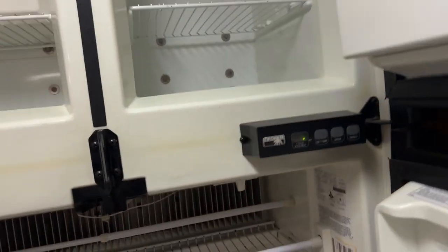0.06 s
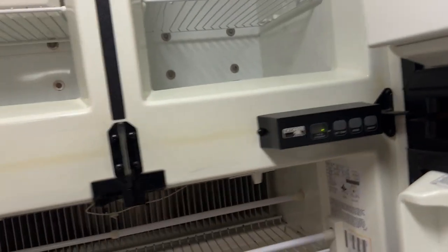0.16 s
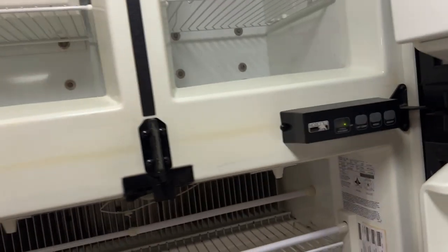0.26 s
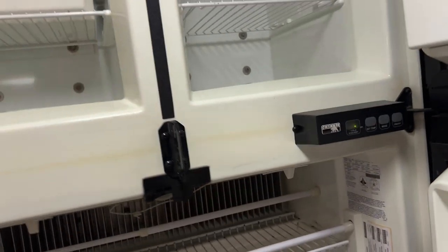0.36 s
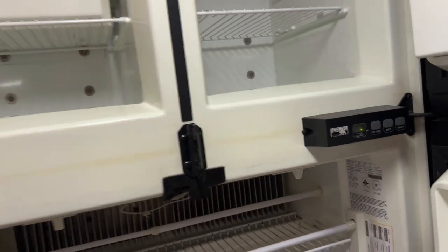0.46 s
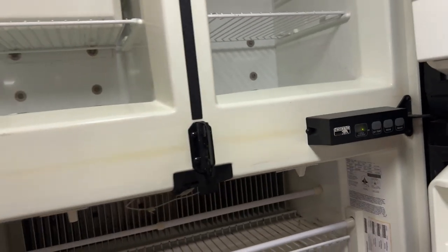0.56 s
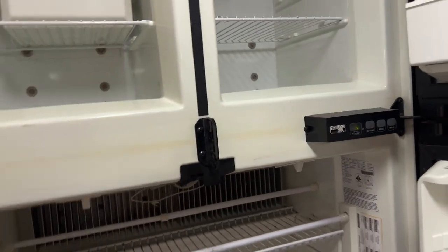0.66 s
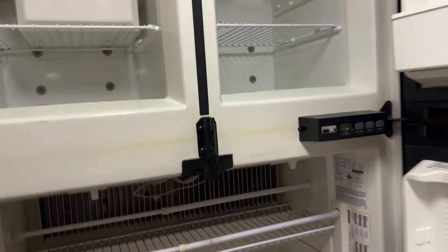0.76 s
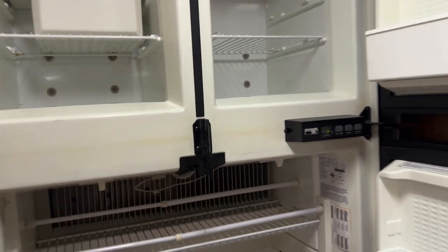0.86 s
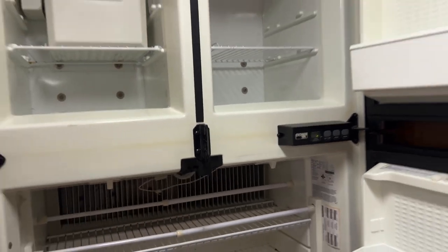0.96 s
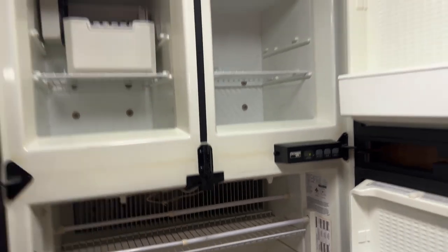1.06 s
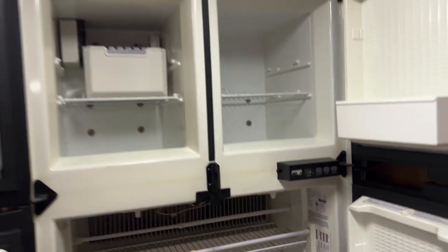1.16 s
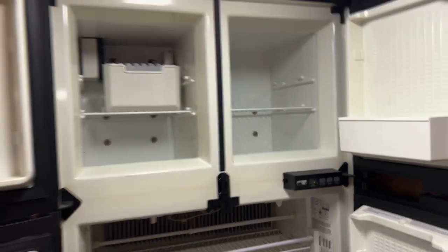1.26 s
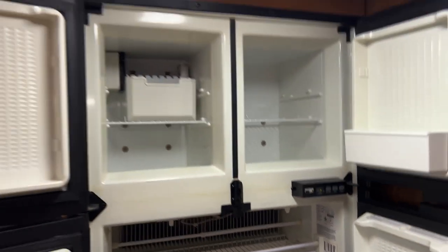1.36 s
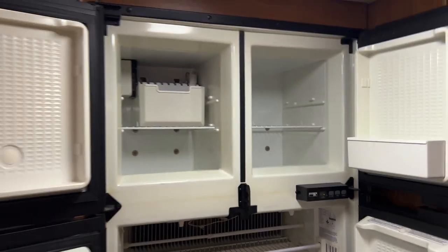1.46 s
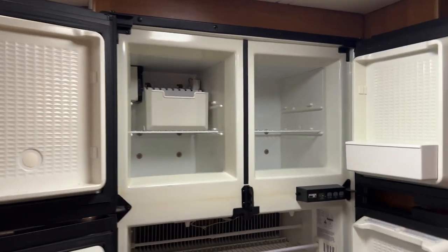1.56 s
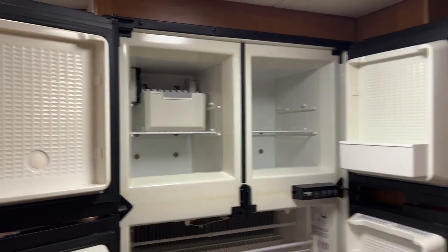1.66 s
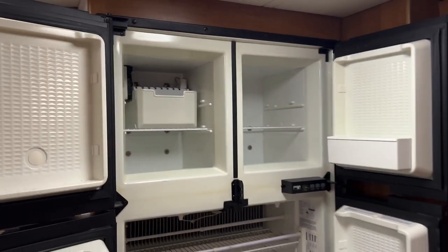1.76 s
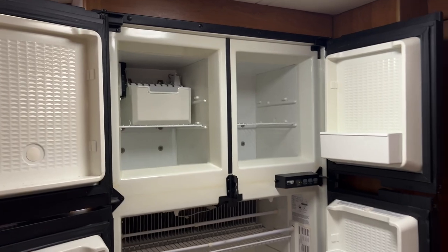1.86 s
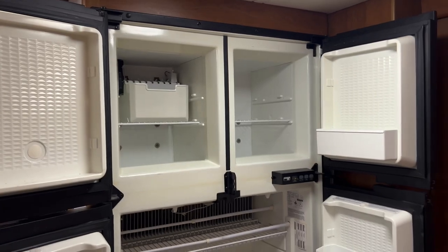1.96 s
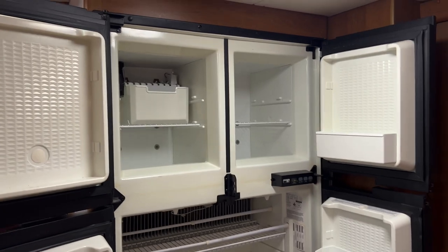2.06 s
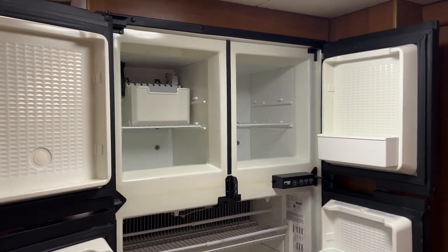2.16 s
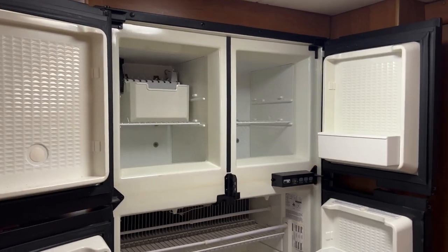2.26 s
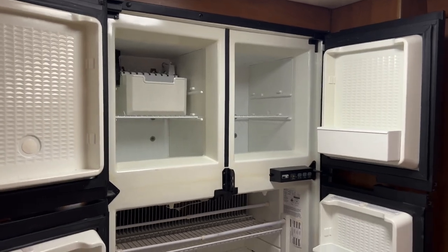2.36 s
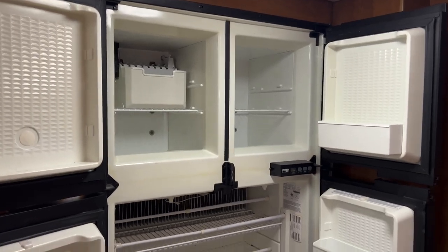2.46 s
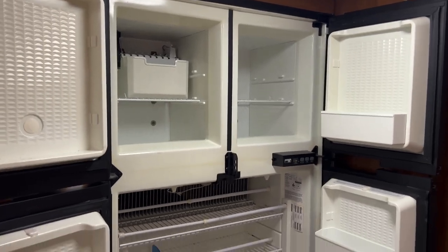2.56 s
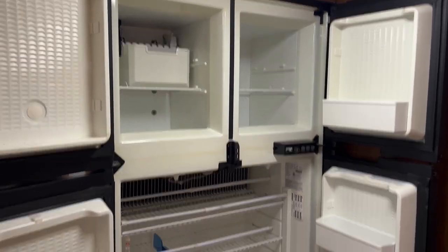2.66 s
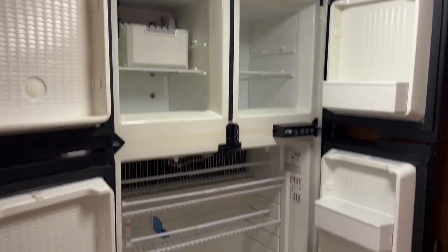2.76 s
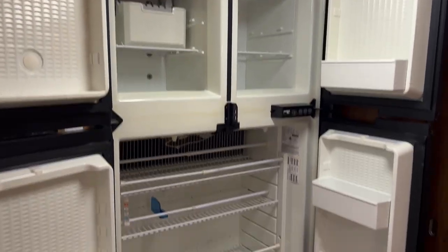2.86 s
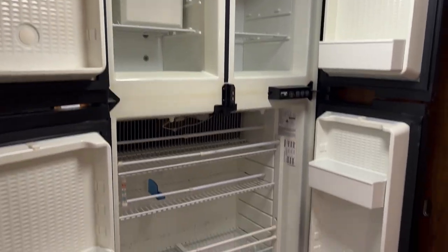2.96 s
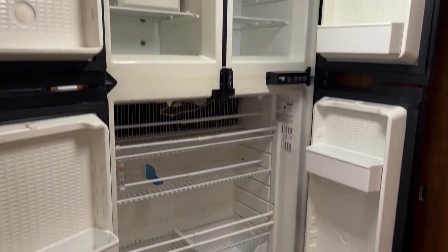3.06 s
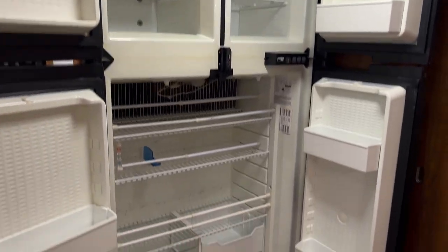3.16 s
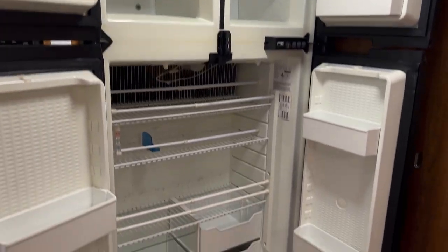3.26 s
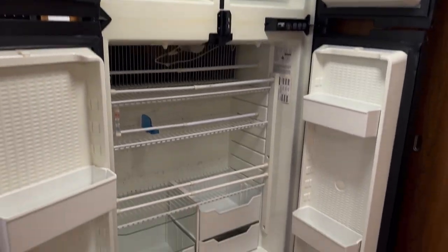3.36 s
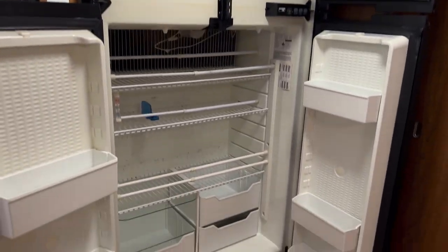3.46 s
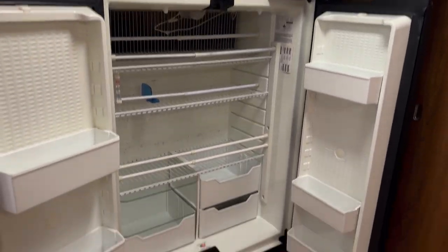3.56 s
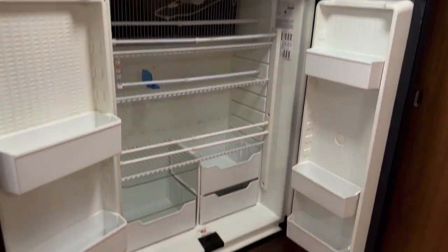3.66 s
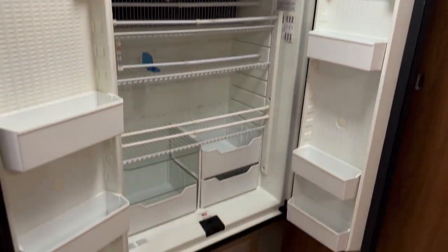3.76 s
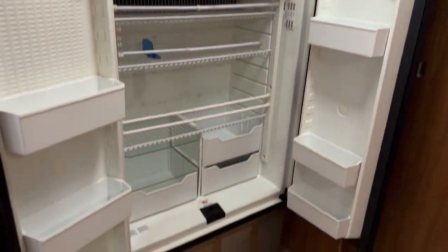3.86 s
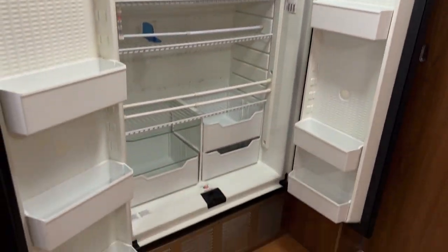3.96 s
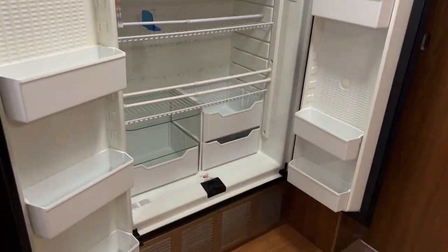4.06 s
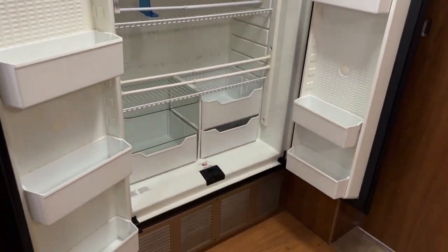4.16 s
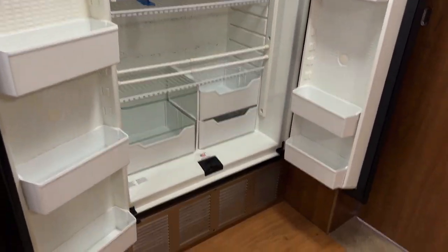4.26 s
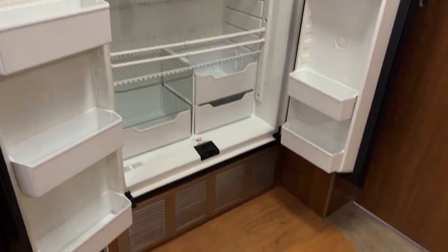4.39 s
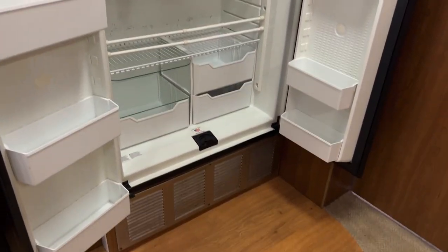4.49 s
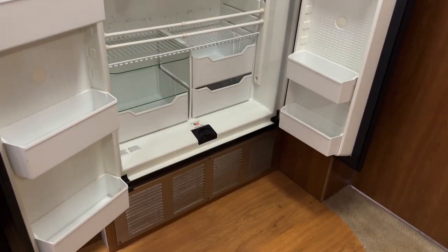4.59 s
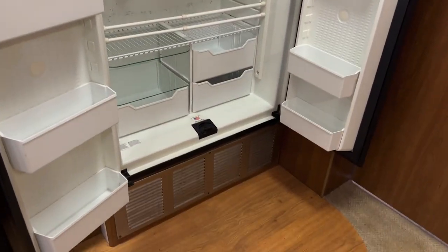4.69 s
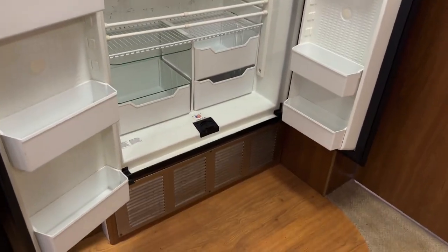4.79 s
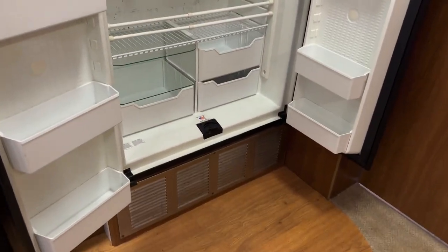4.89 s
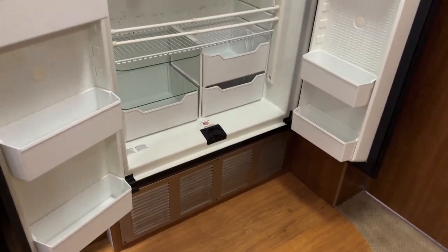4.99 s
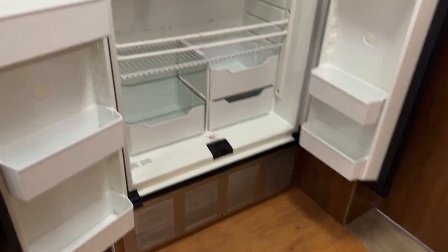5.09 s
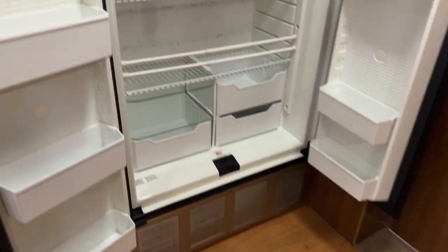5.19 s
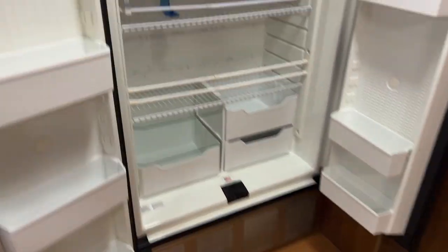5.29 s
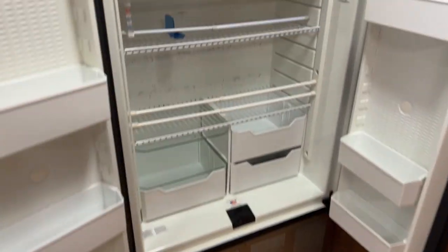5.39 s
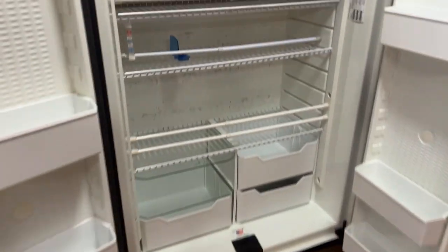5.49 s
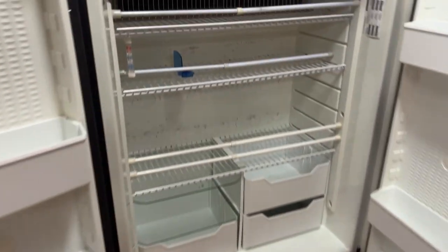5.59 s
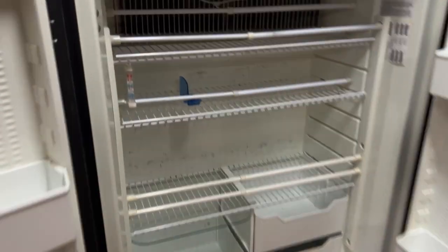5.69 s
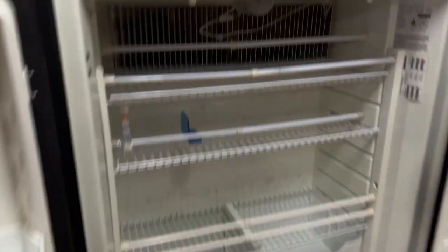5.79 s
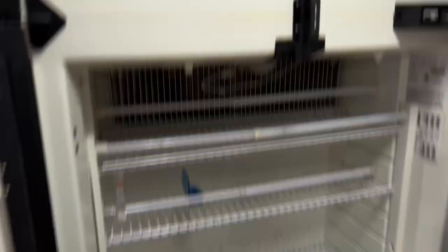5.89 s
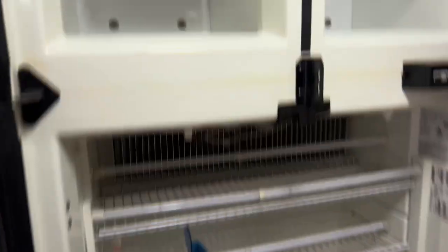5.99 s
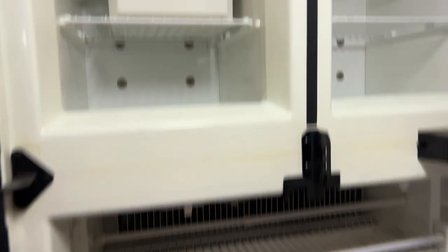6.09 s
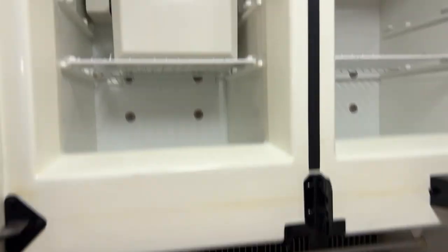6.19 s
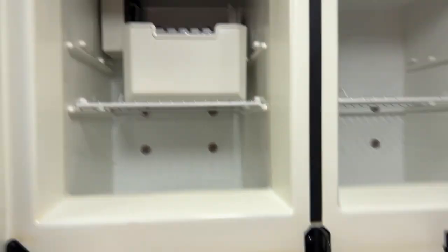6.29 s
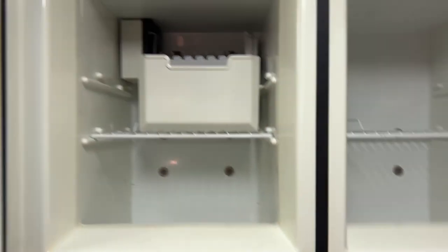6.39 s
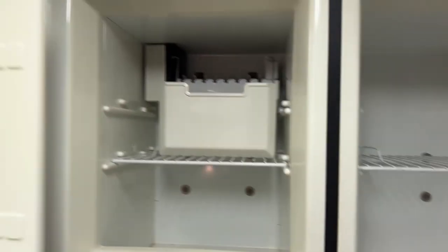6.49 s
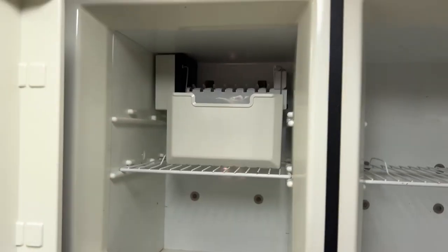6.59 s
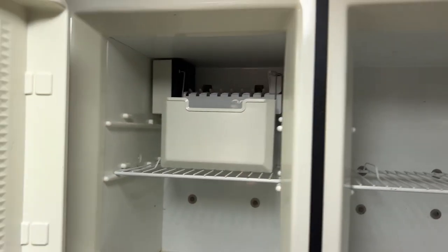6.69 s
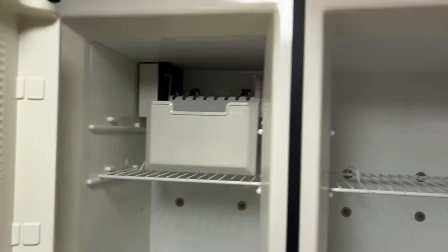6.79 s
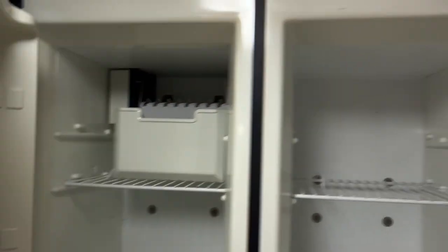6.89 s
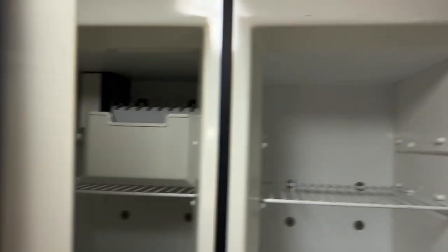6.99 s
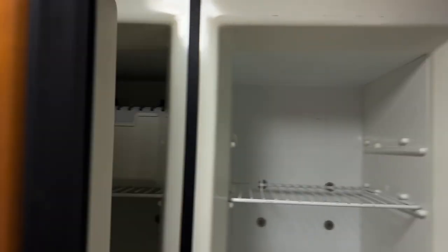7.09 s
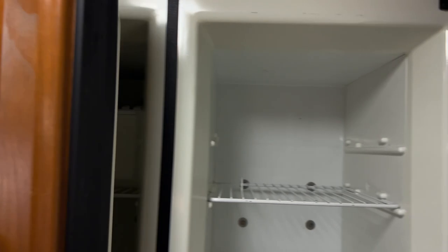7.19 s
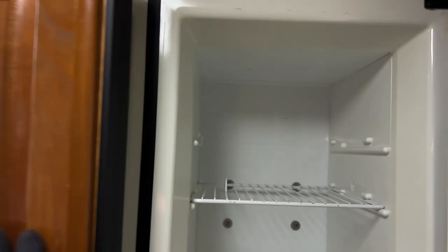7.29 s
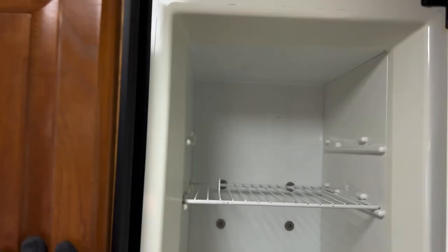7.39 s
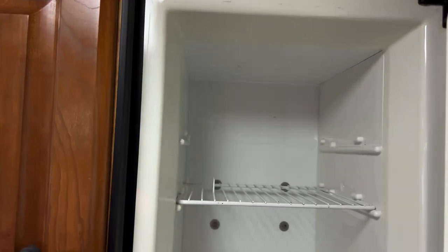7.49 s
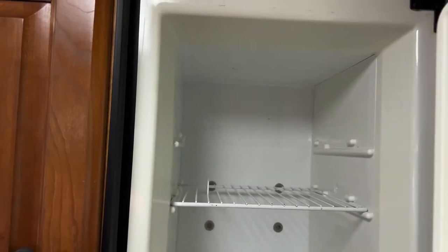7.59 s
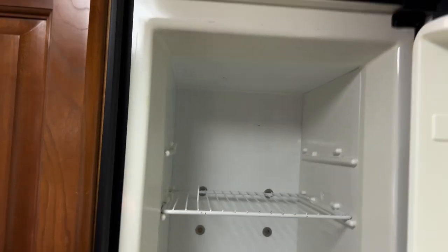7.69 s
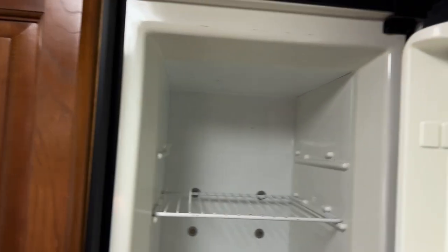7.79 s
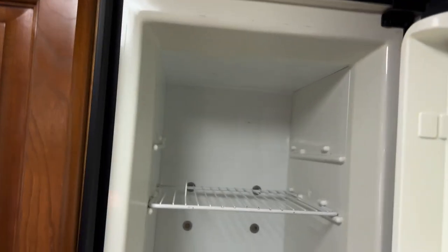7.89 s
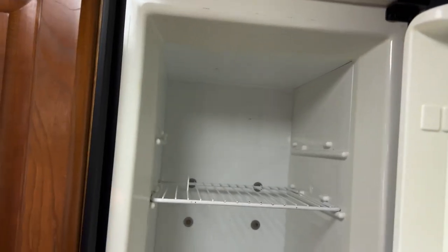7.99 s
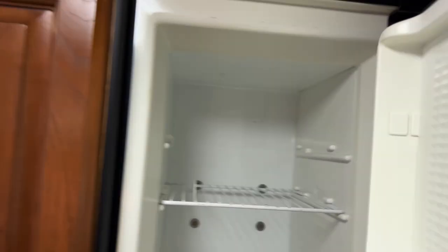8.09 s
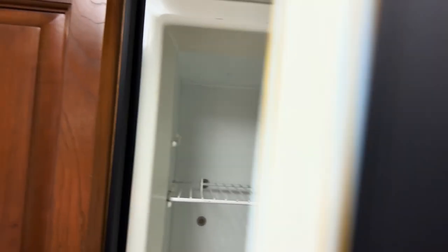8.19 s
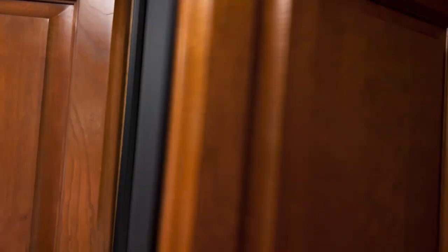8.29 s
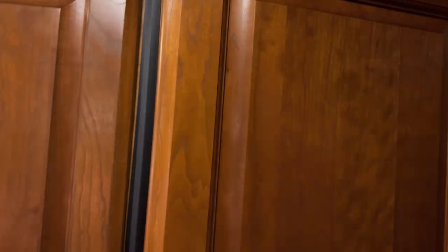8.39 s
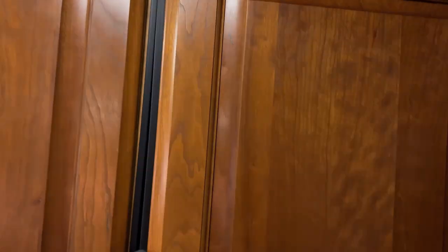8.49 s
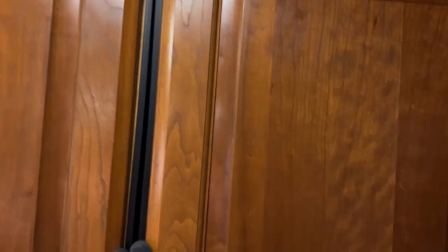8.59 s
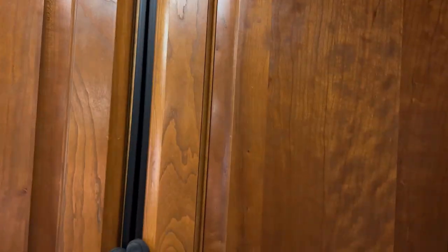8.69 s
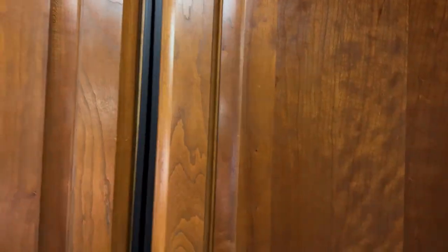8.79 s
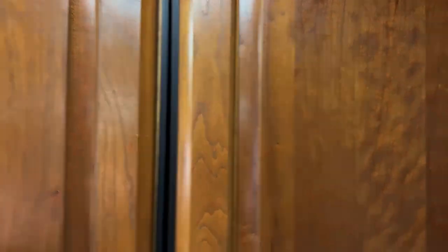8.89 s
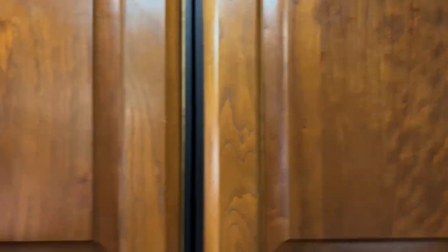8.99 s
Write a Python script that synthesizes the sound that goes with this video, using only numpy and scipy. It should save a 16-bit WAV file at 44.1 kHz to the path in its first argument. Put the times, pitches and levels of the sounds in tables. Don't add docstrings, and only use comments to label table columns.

```python
import sys
import numpy as np
from scipy import signal
from scipy.fft import rfft, irfft, next_fast_len
from scipy.io import wavfile
from scipy.ndimage import uniform_filter1d

SR = 44100
rng = np.random.default_rng(int(sys.argv[2]) if len(sys.argv) > 2 else 0)


def dump(signal):
    limited = np.clip(np.atleast_2d(signal).T, -1, 1)
    pcm = np.round(limited * 32767).astype(np.int16)
    wavfile.write(sys.argv[1], SR, pcm)


def amplitude_ratio(level_db):
    exponent = np.asarray(level_db, float) / 20
    return 10 ** exponent


N = 399105


def evened(x):
    return x / np.sqrt(np.mean(x ** 2) + 1e-20)


def read(points, hz):
    f, value = np.transpose(points)
    return np.interp(np.log(hz + 1), np.log(f + 1), value)


def add(mix, s, sound):
    part = mix[:, max(round(s * SR), 0):][:, :sound.shape[-1]]
    part += sound[..., :part.shape[1]]


def drift(hz):
    steps = rng.standard_normal(400)
    return evened(np.interp(np.arange(N) / SR * hz, np.arange(400), steps))


def resonate(x, hz, width):
    return signal.lfilter(*signal.iirpeak(hz, hz / width, fs=SR), x)


def two_ports(a, b, same, hz):
    like = np.clip(read(same, hz), 0, 1)
    if a.ndim == 2:
        like = like[:, None]
    return np.array([a, like * a + np.sqrt(1 - like ** 2) * b])


def port_phase(hz, draw):
    return 1.7 * min(hz / 1500, 1) * (draw - .5) * np.array([[1], [-1]])


def noise(points, patchy_db, flicker_db, same):
    frames, hz = N // 256 + 5, np.fft.rfftfreq(512, 1 / SR)
    a, b, c, d, patches = rng.standard_normal((frames, 257, 5)).T
    patches = uniform_filter1d(patches, size=8, axis=0)
    patches = evened(uniform_filter1d(patches, size=14, axis=1))
    z = two_ports(a + 1j * b, c + 1j * d, same, hz)
    flicker = flicker_db * rng.standard_normal(frames)
    z *= amplitude_ratio(read(points, hz)[:, None] + patchy_db * patches + flicker)
    return evened(signal.istft(z, nperseg=512, noverlap=256)[1][:, :N])


def zones(rows, nodes):
    edge_db, edge_bend, node_s = -11, 3.9, 0.4
    t = np.arange(0, N + 256, 256) / SR
    swing = sum(amplitude_ratio(db + edge_db * abs((t - s) / reach) ** edge_bend) for db, s, reach in rows)
    for s in nodes:
        swing = swing * np.tanh((t - s) / node_s)
    return np.interp(np.arange(N) / SR, t, swing)


# level/dB, centre t/s, reach/s
HUM = [
    [(-35, 3, 10), (-44.5, .5, 1.6), (-40.5, 7.4, 2.2)],
    [(-37.5, .05, .55), (-38.5, 1.16, 0.63), (-43.5, 2.6, 0.8), (-40, 4.52, 0.97), (-33, 7.6, 1.9)],
    [(-55.5, 0.082, 0.31), (-50.5, 2.58, 1.13), (-53, 4.5, 1.12), (-62.5, 6.6, 0.89), (-53.5, 9, 2.5)],
    [(-50.5, 0.93, 1), (-53, 2.27, 0.99), (-54, 4.23, 1.12), (-52, 5.85, 0.62), (-56.5, 7.5, 1.6)],
]
NODES = [
    [],
    [3.02, 5.8],
    [.88, 6.8],
    [1.5, 5.37],
]
# order, level/dB, loudest t/s, lasting/s
UPPER = [(.5, -58.5, 4, 9), (1.5, -64.5, 4, 9), (2.5, -70, 3.3, 7.7), (5, -74, 6, 2.7), (6, -64, 4.1, 1.8),
         (7, -68, 7.5, 2.1), (8, -67, 4.8, 2), (9, -69.5, 4.9, 0.3), (10, -70.5, 2.6, 0.81),
         (10, -72, 5.5, 1.1), (6.5, -74.5, 2.5, 3.2), (7.5, -74.5, 3.5, 1.8), (8.5, -72.5, 2.6, 4.2),
         (9.5, -78, 3.1, 2.5), (11.5, -81, 3.5, 1.8), (11, -70.5, 4.5, 0.57), (12, -74, 2.7, 2.2),
         (12.5, -75, 7.1, 2.7), (13.5, -77, 2.5, 1.6), (14, -81, 6.1, 1.5)]
# level/dB, centre t/s, reach/s
PANEL = [(-66, 2.34, 0.84), (-69, 3.43, 0.38), (-74, 4.58, 0.68), (-71, 5.51, 0.28), (-75, 6.8, .8)]


def generator():
    turn = 2 * np.pi * np.cumsum(51.12 + .06 * drift(5.)) / SR
    level = amplitude_ratio(-1.0 + 0.5 * drift(25.))
    out = np.zeros(N)
    for k, rows in enumerate(HUM):
        out += zones(rows, NODES[k]) * level * np.cos((k + 1) * turn - 1.007 * k)
    for order, db, s, lasting in UPPER:
        swing = np.cos(order * turn + 2 * np.pi * rng.random())
        out += zones([(db, s, lasting)], []) * amplitude_ratio(1.2 * drift(7.1)) * swing
    return out + zones(PANEL, []) * amplitude_ratio(5 + .8 * drift(12.)) * np.cos(13 * turn)


# f/Hz, level/dB per Hz
AIR = [(100, -35), (170, -5), (214, -6), (254, -8.5), (402, -14.5), (506, -18), (637, -16.5), (882, -26.5),
       (2210, -31.5), (2890, -45), (4500, -55), (7110, -52), (9500, -63), (12200, -64), (16500, -74)]
# f/Hz, level/dB per Hz
RUMBLE = [(15, -35.5), (30, -17), (80, 4), (130, 0.5)]
# f/Hz, likeness/1
SAME = [(60, 0.23), (180, -0.74), (550, -0.25), (1650, -1.6), (4970, 0.8), (15000, 0.38)]


def air():
    size = next_fast_len(N, True)
    hz = np.fft.rfftfreq(size, 1 / SR)
    a, b = rfft(rng.standard_normal((2, size)))
    z = two_ports(a, b, SAME, hz) * amplitude_ratio(read(RUMBLE + AIR[1:], hz))
    throb_db = 0.57 * np.cos(2 * np.pi * 51.12 * np.arange(N) / SR)
    return amplitude_ratio(-51 + 0.64 * drift(9.6) + throb_db) * evened(irfft(z, size)[:, :N])


# f/Hz, level/dB per Hz
CLOTH = [(1650, -29), (2800, -4.5), (8590, -12.5), (10300, -24), (13700, -23.5), (15100, -17.5),
         (16100, -24.5), (16500, -45.5)]
# f/Hz, likeness/1
NEAR = [(200, 0.96), (1000, 0.28), (4000, 0.16), (8000, 0.56), (12000, 1)]
# start t/s, end t/s, hiss level/dB, duller level/dB
STROKES = [(0.095, 0.154, -63, -56.5), (0.133, 0.342, -62, -58), (0.265, 0.56, -63.5, -60),
           (0.524, 0.685, -73, -67), (0.744, 0.815, -60.5, -57), (0.792, 0.891, -72, -61.5),
           (0.926, 1.056, -65.5, -60), (1.045, 1.09, -54, -53.5), (1.135, 1.167, -75, -62),
           (1.149, 1.218, -66, -60.5), (1.518, 1.598, -76, -67.5), (1.683, 1.8, -87, -71),
           (2.035, 2.1, -85, -66.5), (2.216, 2.284, -73.5, -62), (2.405, 2.49, -82, -66.5),
           (2.523, 2.575, -83, -71), (5.022, 5.065, -78, -73), (5.191, 5.308, -75, -68),
           (5.295, 5.352, -85, -69), (5.525, 5.7, -76.5, -67), (5.968, 6.163, -81, -65),
           (6.102, 6.212, -73, -68), (6.11, 6.158, -69, -54), (6.13, 6.563, -73.5, -64.5),
           (6.498, 6.596, -70, -71), (6.575, 6.79, -85, -71.5), (6.786, 7.064, -66, -62.5),
           (7.11, 7.492, -69, -68.5), (7.354, 7.474, -69, -76), (7.612, 7.727, -67, -65.5),
           (7.961, 8.008, -65, -57), (7.996, 8.149, -64, -59.5), (8.16, 8.266, -56.5, -49.5),
           (8.286, 8.414, -66.5, -61.5), (8.379, 8.565, -65.5, -57), (8.76, 8.84, -79, -68)]
# start t/s, end t/s, level/dB
SLIDES = [(0.773, 0.825, -93), (.955, 1.013, -81), (1.049, 1.063, -67), (6.898, 7.023, -80),
          (7.302, 7.456, -75), (7.478, 7.554, -56.5), (8.6, 8.681, -55), (7.973, 8.007, -82),
          (8.023, 8.103, -71.5), (8.188, 8.257, -58.5), (8.305, 8.38, -74.5), (8.466, 8.522, -71.5),
          (8.78, 8.826, -82.5)]
# t/s, level/dB
MOVING = [(0, -76.5), (1.2, -78), (2.6, -86), (2.9, -110), (4.8, -110), (5.3, -80.5), (6, -78.5),
          (7.1, -84.5), (8, -83.5), (8.7, -68.5), (9, -79.5)]


def rustle():
    strokes = np.zeros((3, N))
    for start, end, db, dull_db in STROKES:
        levels = amplitude_ratio(np.array([db, dull_db, db - 32.5 + 0.74 * (db + 61.5)]))
        add(strokes, start, levels[:, None] * signal.windows.tukey(round((end - start) * SR), .65))
    for start, end, db in SLIDES:
        shape = signal.windows.tukey(round((end - start) * SR), .5)
        add(strokes[2:], start, amplitude_ratio(db + 8.5) * shape[None])
    keep = np.exp(-1 / (0.0029 * SR))
    hiss, under, top = signal.lfilter([1 - keep], [1, -keep], strokes) * amplitude_ratio(1.2 * drift(23.0))
    cloth = noise(CLOTH, patchy_db=3.5, flicker_db=0.5, same=NEAR)
    dull = noise([(250, -30), (500, -2), (1200, -1), (2100, 0), (3000, -9), (4500, -35)],
                 patchy_db=1.2, flicker_db=1.4, same=NEAR)
    bright = evened(signal.sosfilt(signal.butter(6, 10000, "high", fs=SR, output="sos"), cloth))
    fibres = amplitude_ratio(5.0 * rng.exponential(1, N)) * (rng.random(N) < 500 / SR)
    snaps_free = evened(signal.lfilter([1], [1, -np.exp(-1 / (.001 * SR))], fibres))
    grain = evened(1 + 0.12 * snaps_free)
    s, db = np.transpose(MOVING)
    bed = amplitude_ratio(np.interp(np.arange(N) / SR, s, db) + 4.1 * drift(40.0))
    return grain * (hiss + bed) * cloth + under * dull + top * bright


def knocks(rows, modes, ring_db, crack_db, bend, rise, top_db, mid_hz=4000):
    out, t = np.zeros((2, N)), np.arange(4200) / SR
    edges = [(200, 1000), (900, mid_hz), (mid_hz, 9500), (9500, 17000)]
    bands = [signal.butter(3, hz, "band", fs=SR, output="sos") for hz in edges]
    apart = [0.4, 1.0, 0.29, 0.083]
    for s, db, low_db, high_db, t60 in rows:
        shared, left, right = rng.standard_normal((3, len(t)))
        own = np.array([left, right])
        low, mid, high, top = (evened(signal.sosfilt(b, shared + a * own)) for a, b in zip(apart, bands))
        fall = amplitude_ratio(-60 * (t / np.clip(t60, .005, .2)) ** bend)
        crack = amplitude_ratio(crack_db - 60 * t / 0.0016)
        blow = amplitude_ratio(low_db) * low * fall * np.minimum(t / 0.0033, 1)
        rattle = mid + amplitude_ratio(high_db) * high + amplitude_ratio(high_db + top_db) * top
        blow += rattle * (fall + crack) * np.minimum(t / .001, 1)
        for (hz, mode_db, ring), (u, v, w) in zip(modes, rng.random((len(modes), 3))):
            near_hz = hz * (1 + .03 * (u - .5))
            swing = np.sin(2 * np.pi * (near_hz * t + v) + port_phase(hz, w))
            woken_db = 0.49 * low_db * (hz < 1e3) + .5 * high_db * (hz > 4e3)
            level = amplitude_ratio(ring_db + mode_db + 4 * u + woken_db - 60 * t / ring)
            blow += level * np.sqrt(fall) * swing * np.minimum(t / rise, 1)
        add(out, s, amplitude_ratio(db - 10.5) * blow)
    return out


# t/s, peak level/dB, low part/dB, sharp part/dB, t60/s
LATCH = [(0.0004, -16.5, 2.5, -7.5, 0.047), (0.0116, -27.5, -7, -10, 0.091), (0.297, -41, 4, -3.5, 0.23),
         (0.3336, -18, 1.5, -24, 0.019), (0.3402, -23, 6.5, -33, 0.021), (0.3698, -20, -3, -16, 0.02),
         (0.3804, -32, 15, -4, 0.023), (0.399, -39, -21, 3, 0.02), (0.4074, -32, -13, -26, 0.035),
         (0.4479, -32, -0.5, -18, 0.046), (0.4938, -39.5, 4.5, -36, 0.052), (0.626, -36.5, 0.5, -49, 0.05),
         (0.7557, -31, 6, -38, 0.035), (0.778, -42.5, -19, -33, 0.053), (0.817, -42, -11, -21, 0.029),
         (0.9598, -35.5, -3, -10.5, 0.026), (1.0011, -45.5, 1, -15, 0.03), (1.064, -38.5, 6, 2.5, 0.022),
         (1.0744, -56, 7, 1, 0.018)]
# f/Hz, level/dB, t60/s
LATCH_MODES = [(622.6, -5.5, 0.018), (872, -4, .03), (1360, 6.5, 0.0089), (1830, 0.5, 0.027),
               (2720, -10.5, 0.02), (2683, -11, 0.021)]


def latches():
    return knocks(LATCH, LATCH_MODES, ring_db=-0.5, crack_db=-8.5, bend=1.83, rise=0.0016,
                  top_db=-11.0, mid_hz=2500)


# t/s, peak level/dB, f/Hz, t60/s
RINGS = [(0.001, -19, 2110, 0.028), (0.008, -23.5, 502, 0.032), (0.181, -48, 1930, 0.081),
         (0.3335, -20.5, 1963, 0.025), (0.336, -26, 620, 0.037), (0.342, -20, 1370, 0.018),
         (0.3708, -18.5, 1720, 0.032), (0.3697, -30, 2720, 0.018), (0.376, -22.5, 449, 0.041),
         (0.406, -33, 1860, 0.048), (0.4479, -32, 1970, .04), (0.496, -45, 1310, 0.048),
         (7.4365, -39, 1255, 0.083), (7.455, -28, 3000, .025), (7.468, -28, 1910, 0.035),
         (7.478, -12.5, 5020, 0.012), (7.479, -11.5, 1940, 0.019), (8.5423, -19.5, 1104, 0.066),
         (8.556, -14, 1875, 0.039), (8.562, -18.5, 608, 0.1), (8.609, -22.5, 620, 0.1),
         (8.608, -32, 4060, .04), (8.648, -29, 860, 0.036), (1.155, -40, 8760, 0.0056),
         (1.1553, -49, 3480, .004), (2.0517, -65, 7000, .004), (2.1894, -65.5, 7000, .004),
         (2.5066, -64, 7800, 0.0034), (2.5321, -59.5, 6600, 0.0046), (3.003, -58, 7000, 0.0038),
         (3.2807, -49, 12300, .008), (3.448, -70, 6420, .004), (3.4834, -59, 6500, .004),
         (3.959, -56.5, 3800, 0.0047), (4.079, -73, 5520, 0.0033), (5.0419, -65.5, 7550, .004),
         (8.186, -41, 5500, 0.0032), (8.3297, -48, 2200, 0.0094), (8.231, -31, 1723, 0.024),
         (8.3737, -51, 1500, 0.046), (2.241, -58, 1090, 0.13), (5.577, -49, 1810, 0.05),
         (5.79, -50, 423, 0.11), (5.819, -56, 323, .08), (5.828, -54, 553, 0.044),
         (2.005, -51.5, 307, 0.11), (5.308, -59, 1885, 0.073), (1.155, -38.5, 1190, .008)]


def rings():
    out, t = np.zeros((2, N)), np.arange(5000) / SR
    for (s, db, hz, t60), (u, v) in zip(RINGS, rng.random((len(RINGS), 2))):
        swing = np.sin(2 * np.pi * (hz * t + u) + port_phase(hz, v))
        swing += .45 * evened(resonate(rng.standard_normal((2, len(t))), hz, hz / 7))
        add(out, s, amplitude_ratio(db - 60 * t / t60) * swing * (1 - np.exp(-t / (0.018 * t60))))
    return out


# t/s, peak level/dB, f/Hz, t60/s
THUMPS = [(0.014, -25, 79.6, 0.43), (1.576, -37, 89, 0.12), (2.003, -42, 204, 0.1),
          (2.018, -57.5, 423, 0.38), (5.303, -31, 270, 0.1), (5.311, -57, 440, 0.095),
          (5.785, -53, 367, 0.09), (5.823, -52, 370, 0.081), (5.828, -34, 183, 0.053),
          (6.048, -43, 293, 0.047), (6.282, -32, 74, 0.2), (6.285, -34.5, 318, 0.027),
          (7.461, -18.5, 94.5, 0.11), (7.492, -5.5, 67.1, 0.08), (7.492, -17, 119.7, 0.18),
          (7.511, -13, 75.5, 0.067), (7.978, -26.5, 87, 0.26), (8.059, -53, 557, 0.44),
          (8.21, -47, 535, 0.24), (8.329, -29.5, 138, 0.35), (8.5629, -14, 76.6, 0.21),
          (8.572, -16.5, 133, 0.093), (8.566, -25.5, 252.6, 0.11), (8.609, -10.5, 80.9, 0.092),
          (8.616, -21.5, 143, 0.18), (8.771, -29, 84, 0.14)]


def thumps():
    out, t = np.zeros((2, N)), np.arange(9000) / SR
    for s, db, hz, t60 in THUMPS:
        swing = np.sin(2 * np.pi * hz * (t + 0.00037 * (1 - np.exp(-t / 0.16))))
        rough = resonate(resonate(rng.standard_normal(len(t)), hz, hz), hz, hz)
        swing += np.clip(hz / 400, 0, 1) * evened(rough)
        add(out, s, amplitude_ratio(db - 60 * t / t60) * swing * (1 - np.exp(-t / 0.0028)))
    return out


# t/s, peak level/dB, f/Hz, rise/s
SWELLS = [(0.168, -49.5, 1923, .014), (0.3365, -25, 830, 0.0016), (0.342, -28.5, 900, 0.0017),
          (0.3454, -31.5, 1500, 0.0018), (0.345, -37.5, 2200, 0.0016), (0.378, -30, 620, 0.0033),
          (0.382, -29, 1800, 0.0012), (0.394, -41, 1550, .003), (0.414, -41, 1850, 0.0046),
          (0.448, -39.5, 2600, .002), (0.495, -44.5, 1200, 0.0025), (1.366, -53, 450, 0.0059),
          (1.545, -62.5, 1400, .006), (1.57, -48.5, 420, 0.0034), (2.012, -47, 406, 0.0049),
          (5.785, -45, 380, 0.0042), (5.805, -55, 650, 0.0045), (5.822, -41, 380, 0.004),
          (5.835, -48, 520, 0.003), (6.005, -49, 620, 0.0034), (6.038, -38, 330, 0.003),
          (6.044, -49, 720, 0.006), (6.058, -50, 600, 0.0033), (7.4365, -30.5, 2800, .0012),
          (7.439, -32.5, 4500, .0012), (7.4556, -24, 3000, 0.0011), (7.465, -38, 1980, 0.0054),
          (7.479, -19, 6200, 0.00088), (7.479, -16.5, 4400, 0.00091), (7.482, -21, 1100, 0.0014),
          (7.484, -19, 560, 0.0023), (7.523, -15, 70, .005), (7.975, -58, 1360, 0.0049),
          (7.98, -46, 560, 0.0057), (7.978, -55, 900, 0.006), (8.5414, -11, 1090, 0.003),
          (8.549, -17.5, 1150, .003), (8.556, -13, 990, 0.0026), (8.541, -21.5, 2220, 0.0034),
          (8.549, -23, 2230, 0.0035), (8.592, -29.5, 870, .003), (8.608, -15, 800, 0.0012),
          (8.607, -21, 1800, 0.0018), (8.617, -13, 78, .006), (8.649, -26.5, 980, 0.0019)]


def swells():
    out = np.zeros((2, N))
    for s, db, hz, rise in SWELLS:
        t = np.arange(0, 8 * rise, 1 / SR)
        shape = (t / rise * np.exp(1 - t / rise)) ** 2
        add(out, s, amplitude_ratio(db) * shape * np.sin(2 * np.pi * hz * t))
    return out


# t/s, peak level/dB, low part/dB, sharp part/dB
TICKS = [(2.2347, -49.5, -10, -13), (2.458, -56, -8, -31), (2.533, -60, -10, -12),
         (5.313, -69, 13.5, -24.5), (5.5756, -53, -33, -28), (5.6973, -51.5, -2, 4),
         (6.0056, -55, 14.5, -22), (6.0424, -50, 7, -14), (6.115, -28.5, -5, -7), (6.1471, -32, 5.5, 0),
         (6.3975, -49, -16, -25), (6.733, -38, 6.5, -11.5), (7.6882, -54.5, 7, 10.5),
         (7.978, -49.5, 7, -6.5), (8.3725, -51.5, 18, -18), (8.778, -60.5, 30.5, -2),
         (8.9412, -50.5, -21.5, -29.5), (9.018, -49.5, -24.5, -22)]


def ticks():
    rows = [(*row, .065 - .002 * (row[1] + 50)) for row in TICKS]
    return knocks(rows, [], ring_db=0, crack_db=6.5, bend=1.0, rise=1, top_db=-12.0)


# t/s, peak level/dB, sharp part/dB
SNAPS = [
    (3.28, -63.5, 3.5),
]


def snaps():
    low_db, t60_s = -14, 0.035
    rows = [(s, db, low_db, sharp_db, t60_s) for s, db, sharp_db in SNAPS]
    return knocks(rows, [], ring_db=0, crack_db=4, bend=2.1, rise=1, top_db=8)


# t/s, peak level/dB, low part/dB, sharp part/dB, t60/s
LEFT_DOOR = [
    (7.4374, -25.5, -27, -11, 0.071),
    (7.455, -19.5, -1.5, -3, 0.097),
    (7.4775, -12.5, -9.5, 4.5, 0.03),
    (7.481, -15.5, -2, -4.5, 0.071),
    (7.4894, -16, 8, -2.5, 0.077),
    (7.5107, -21, 0.5, -8, 0.043),
    (7.5237, -43, -1.5, -2, 0.062),
]
# f/Hz, level/dB, t60/s
LEFT_MODES = [(424.5, -5.5, 0.25), (636, -10.5, 0.21), (1087, -11.5, 0.31), (1240, -8.5, 0.2),
              (1500, -8, 0.028), (1940, -7, 0.033), (3000, -19.5, .04), (4670, 2, 0.0077),
              (6260, -3.5, 0.017), (8880, -1.5, 0.014)]


def left_door():
    return knocks(LEFT_DOOR, LEFT_MODES, ring_db=6.0, crack_db=-1.0, bend=1.0, rise=0.00036, top_db=0.5)


def shelf():
    start_s, stop_s, rise_s, level_db, fade_db_per_s = 7.63, 7.97, 0.068, -58.5, -11.5
    shake = rng.standard_normal(N)
    t = np.arange(N) / SR
    on = np.clip(np.minimum(t - start_s, stop_s - t) / rise_s, 0, 1)
    on *= abs(np.sin(np.pi * (t - 7.768) / .054)) ** .5
    wires = np.zeros(N)
    for hz, width, db in [(449.6, 31, 8.0), (870, 20, -14.0), (940, 6.3, -14.0)]:  # Hz, Hz, dB
        wires += amplitude_ratio(db) * evened(resonate(resonate(shake, hz, width), hz, width))
    return on * amplitude_ratio(level_db + fade_db_per_s * abs(t - start_s)) * wires


# t/s, peak level/dB, low part/dB, sharp part/dB, t60/s
RIGHT_LATCH = [
    (8.5405, -35, -1.5, -13, 0.071),
    (8.5415, -13.5, -8, -2.5, 0.099),
    (8.555, -16, 3, -6.5, 0.03),
]
# f/Hz, level/dB, t60/s
PANEL_MODES = [(426, -15.5, 0.075), (589, 0.5, 0.19), (664, -2, 0.33), (864, 0, 0.11), (970, 1, 0.076)]


def right_latch():
    return knocks(RIGHT_LATCH, RIGHT_MODES, ring_db=10.0, crack_db=-7.0, bend=1.38, rise=0.0045, top_db=-3.5)


# f/Hz, level/dB, t60/s
RIGHT_MODES = [(980, -11, 0.06), (1070, -12, 0.06), (1210, -8, 0.063), (2200, -14.5, 0.08),
               (3370, -13.5, 0.031), (4120, -16, 0.05), (5650, -8.5, 0.061)]
# t/s, peak level/dB, low part/dB, sharp part/dB, t60/s
RIGHT_DOOR = [
    (8.5654, -23, 8, -13.5, 0.2),
    (8.6062, -14, -5.5, 2, 0.13),
    (8.6242, -16.5, 9, 2, 0.037),
    (8.6474, -27, -4.5, -29, 0.071),
]


def right_door():
    return knocks(RIGHT_DOOR, PANEL_MODES, ring_db=-12.5, crack_db=9.0, bend=1.0, rise=0.0021, top_db=-2.0)


def cabin(x):
    taps = np.zeros((2, 16000))
    at = np.arange(200, 15900, 20) + rng.integers(0, 20, (2, 785))
    np.put_along_axis(taps, at, rng.choice([-1., 1.], at.shape), 1)
    hz, t, (a, b) = signal.stft(taps, SR, nperseg=256)
    t60 = read([(200, 0.24), (2000, .15), (10000, 0.12)], hz)[:, None]
    z = two_ports(a, b, NEAR, hz) * amplitude_ratio(-60 * t / t60)
    tail = signal.istft(z, SR, nperseg=256)[1]
    return signal.oaconvolve(x.mean(0)[None], tail / np.linalg.norm(tail[0]), axes=1)[:, :N]


def scene():
    hits = latches() + rings() + swells() + ticks() + snaps()
    hits += left_door() + right_latch() + right_door()
    return hits + amplitude_ratio(-10.5) * cabin(hits) + thumps() + generator() + shelf() + rustle() + air()


def low_pass(x):
    return signal.sosfilt(signal.butter(12, 16810, fs=SR, output="sos"), x)


# f/Hz, level/dB
MICROPHONE = [(20, 2.5), (3000, 1.5), (9000, 1), (12000, 4), (16000, 1), (16700, -45.5)]
# f/Hz, level/dB
LEAN = [(100, 0.1), (600, 3.5), (1400, -0.5), (3100, 2.5), (6800, 7), (12000, -3)]
# f/Hz, phase/rad
PORTS = [(0, 0), (300, -.2), (1000, -.6), (1900, -1.3), (2600, 1.8), (4000, 0), (6000, .5), (7000, 1.3),
         (8300, 0), (16400, -14), (22050, -14)]


def record(dry):
    size = next_fast_len(N + 2048, True)
    hz = np.fft.rfftfreq(size, 1 / SR)
    lead = np.interp(hz, *np.transpose(PORTS))
    half = amplitude_ratio(.5 * read(LEAN, hz)) * np.exp(.5j * lead)
    ports = amplitude_ratio(read(MICROPHONE, hz)) * np.array([half, 1 / half])
    heard = irfft(rfft(dry, size) * ports, size)[:, :N]
    return low_pass(heard)


dry = scene()
out = record(dry)
dump(out)
```